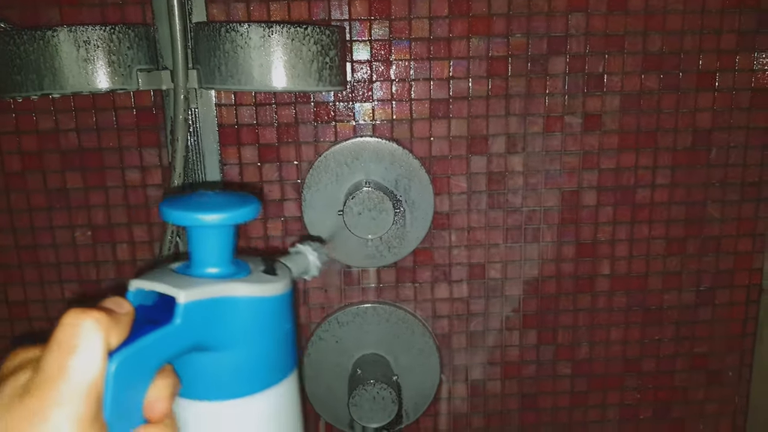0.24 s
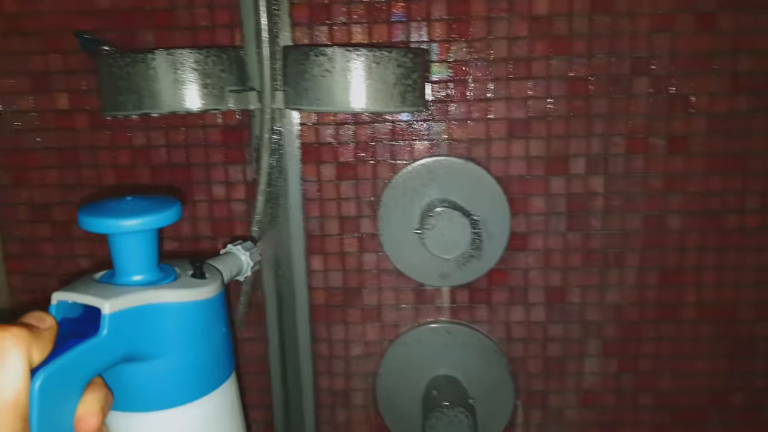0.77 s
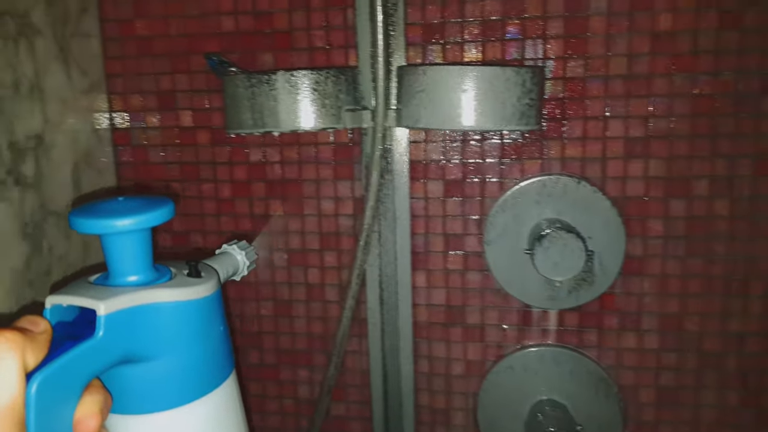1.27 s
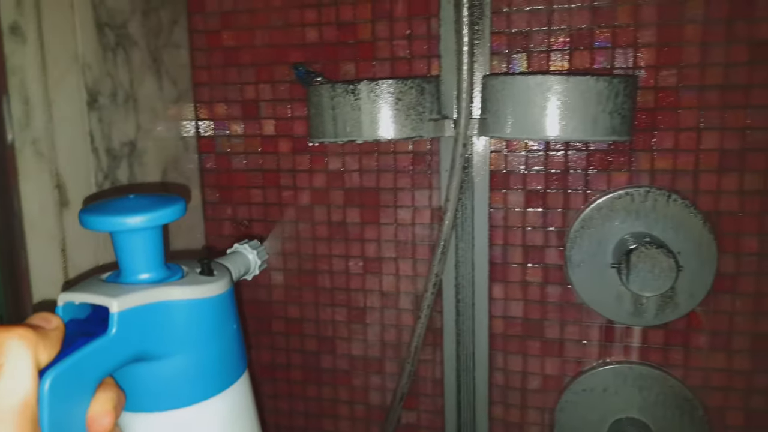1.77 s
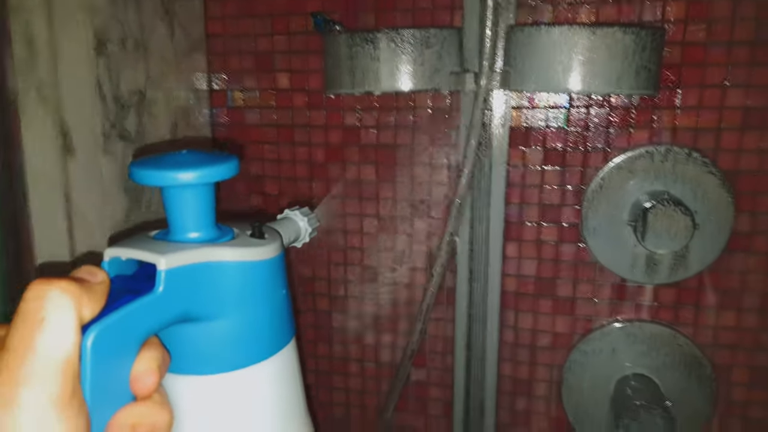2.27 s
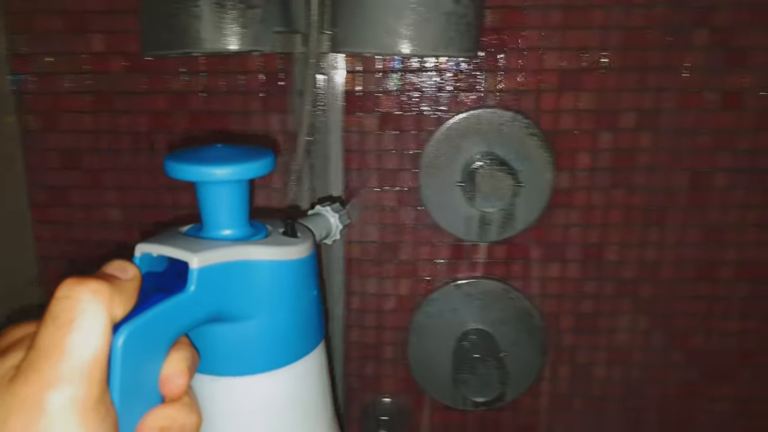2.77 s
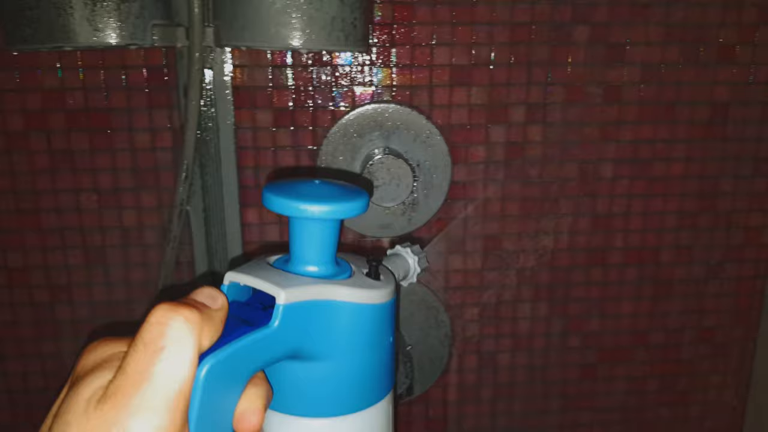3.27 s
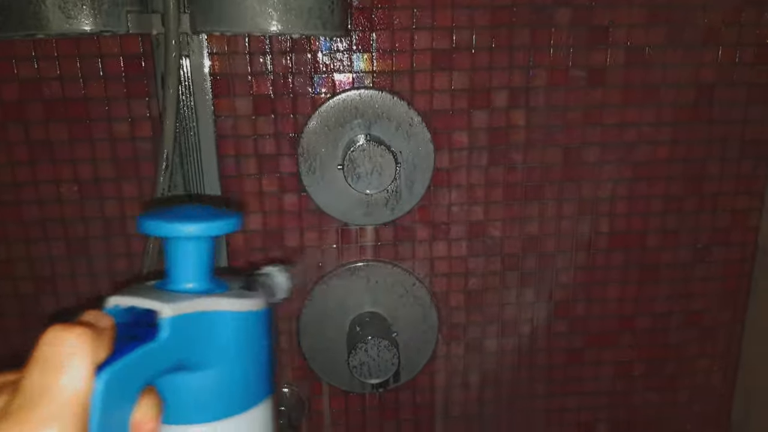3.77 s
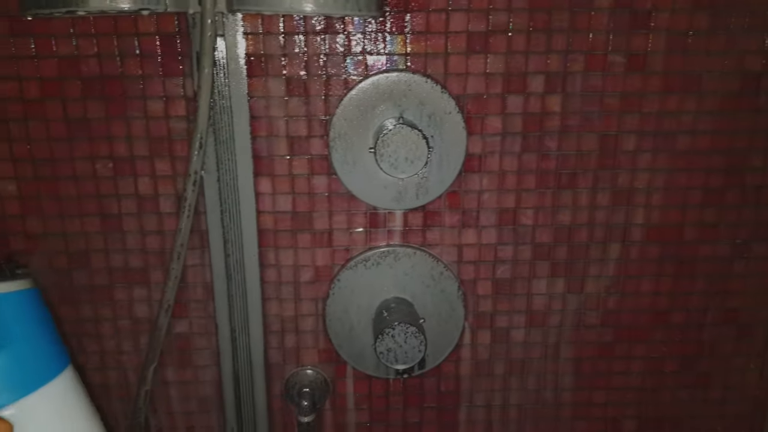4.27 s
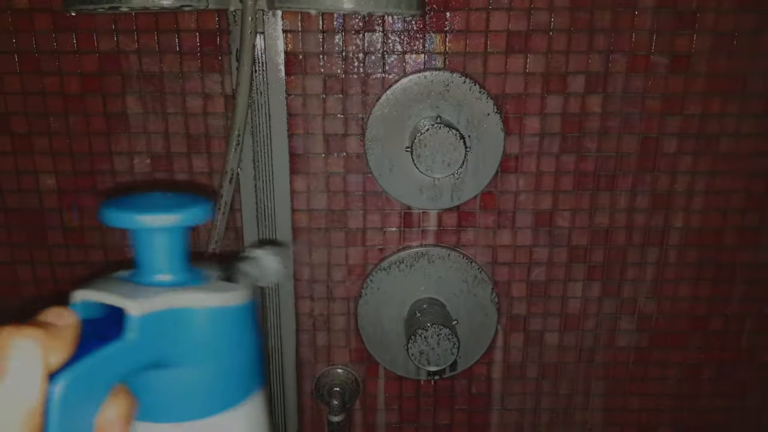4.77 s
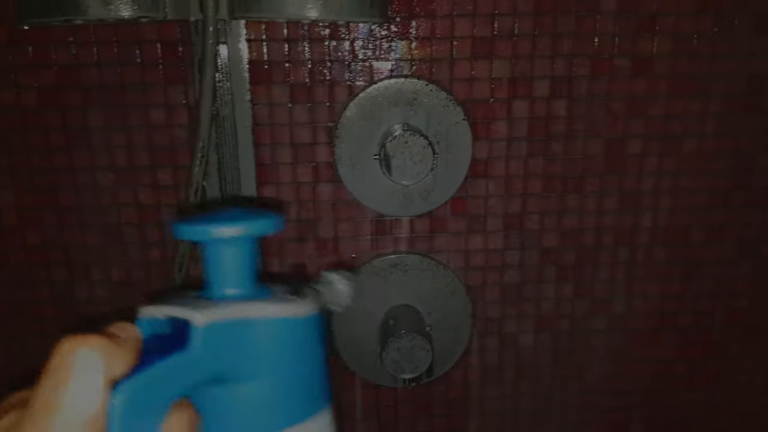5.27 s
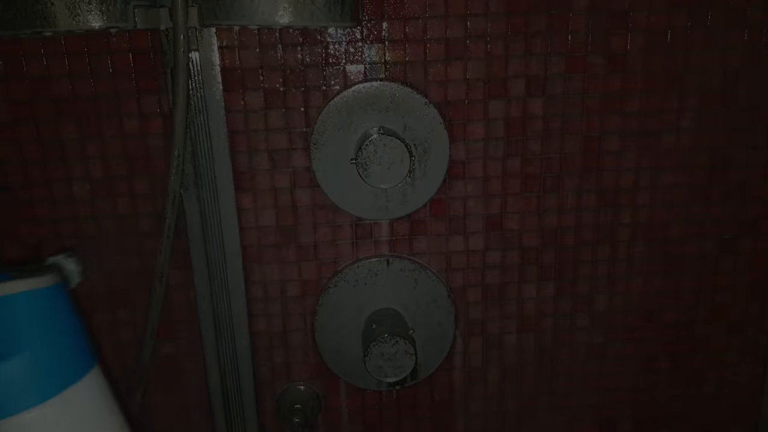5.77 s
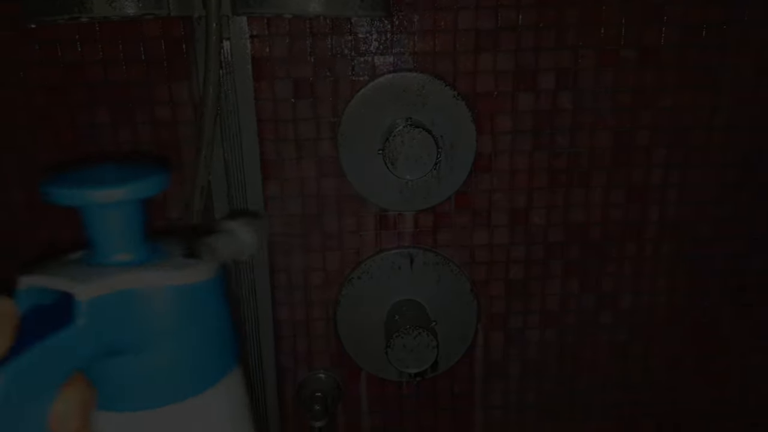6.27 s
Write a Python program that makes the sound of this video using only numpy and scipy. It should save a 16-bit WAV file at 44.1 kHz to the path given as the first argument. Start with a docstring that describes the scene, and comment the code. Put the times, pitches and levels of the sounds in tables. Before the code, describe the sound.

A hand-held pressure sprayer hisses steadily and brightly in a small tiled shower, its fine jet shimmering slightly before gradually fading away.

```python
"""A smooth bright hiss: a hand-held pressure sprayer in a small tiled shower stall, close to two ports.
The jet is coloured noise; delayed copies of it, the tile echoes, comb it, and sway with the hand.
Foam adds a low wash, and the nozzle whistles faintly as narrow gliding noise.
The stall hums as noise rings its low modes, and the grip bumps once as decaying sines and low noise.
The whole sound fades toward the end."""
import sys
import numpy as np
from scipy import signal
from scipy.fft import rfft, irfft
from scipy.io import wavfile

SR = 44100
rng = np.random.default_rng(int(sys.argv[2]) if len(sys.argv) > 2 else 0)


def unload_wav(signal):
    """Save mono or channel-first audio to the path in sys.argv[1] as 16-bit WAV at rate SR, clipped to [-1, 1]."""
    wavfile.write(
        sys.argv[1],
        SR,
        np.round(np.clip(np.atleast_2d(signal).T, -1, 1) * 32767).astype(np.int16),
    )


N = 288400  # length in samples
SPEED_OF_SOUND = 343  # m/s
OPPOSITE = np.array([[1], [-1]])  # signs of a difference between left and right


def from_db(db):
    """Amplitude ratio of a level: 20 dB per factor of ten."""
    return 10 ** (np.asarray(db) / 20)


def rms_one(x):
    """Normalisation to unit root-mean-square amplitude, over all channels together."""
    return x / np.sqrt(np.mean(x ** 2) + 1e-20)


def in_time(rows):
    """Linear interpolation of each column against the first, time in seconds."""
    s, *columns = np.transpose(rows)
    return [np.interp(np.arange(N) / SR, s, column) for column in columns]


def at_hz(points):
    """Interpolation of a (Hz, dB) table on logarithmic frequency, at every FFT bin."""
    hz = np.maximum(np.arange(N // 2 + 1) * SR / N, 1)
    table_hz, table_db = np.transpose(points)
    return np.interp(np.log(hz), np.log(table_hz), table_db)


def coloured(x, db):
    """Linear filtering by multiplication in the frequency domain, without phase shift."""
    return irfft(rfft(x) * from_db(db), N)


def drift(corner_hz):
    """Slow random fluctuation: white noise through two equal one-pole low-passes, unit rms."""
    step, run_in = 40, 4000  # samples per coarse point; coarse points dropped while the filter settles
    pole = np.exp(-2 * np.pi * corner_hz * step / SR)
    coarse = rng.standard_normal(N // step + run_in + 2)
    slow = signal.lfilter([1], [1, -2 * pole, pole * pole], coarse)[run_in:]
    return np.interp(np.arange(N) / step, np.arange(len(slow)), rms_one(slow))


def resonate(x, hz, width_hz):
    """Damped resonance: a conjugate pole pair whose radius sets the bandwidth."""
    radius = np.exp(-np.pi * width_hz / SR)
    poles = [1, -2 * radius * np.cos(2 * np.pi * hz / SR), radius * radius]
    return signal.lfilter([1, 0, -1], poles, x)


def jet_hiss(air, level_db, pan_db):
    """Turbulent jet noise: broadband noise shaped to the nozzle spectrum and panned by level."""
    # Nozzle hiss as the ports colour it. Each row: frequency in Hz, relative density in dB per Hz.
    nozzle_spectrum = [(760, -55), (1300, -26), (2100, -12.5), (2850, -11.5), (3230, -13.5), (3650, -10),
                       (4530, -6.5), (5750, -1), (6450, -2), (7150, 0), (7850, -10), (9300, -9),
                       (10900, -5.5), (11700, -.5), (14300, -1), (14900, 1.5), (16000, 2.5)]
    jet = sputter(rms_one(coloured(air, at_hz(nozzle_spectrum))))
    return jet * from_db(level_db + pan_db / 2 * OPPOSITE)


def sputter(jet):
    """Amplitude modulation by band: each range of the hiss flutters, partly together."""
    # Borders between the ranges. Each entry: frequency in Hz.
    borders_hz = [2920, 4750, 8450, 13200]
    flutter_db, flutter_hz, shared_part = 1.07, 14, 0.11
    shared = shared_part * drift(flutter_hz)
    out = 0
    for hz in borders_hz:
        low = signal.sosfiltfilt(signal.butter(2, hz, fs=SR, output="sos"), jet)
        out = out + low * from_db(flutter_db * (shared + drift(flutter_hz)))
        jet = jet - low
    # the range above the last border has half the flutter of its own
    return out + jet * from_db(flutter_db * (shared + 0.5 * drift(flutter_hz)))


def among_tiles(count=14):
    """Comb filtering: direct white noise meets delayed echoes whose path lengths sway with the hand."""
    first_s, last_s = .0015, .03  # echo delays before the sway
    start_db, t60_s = -12, 0.37  # echo level extrapolated to zero delay; time to fall by 60 dB
    port_gap_m, sway_m, sway_hz = .14, 0.0793, 0.2994
    lead, fine = SR // 10, 4  # samples of noise ahead of the start; oversampling for fine delays
    source = signal.resample(rng.standard_normal(N + lead), fine * (N + lead))
    now = np.arange(N) + lead
    out = np.tile(source[fine * now], (2, 1))
    sway = [drift(sway_hz) for axis in range(3)]
    for lag_s in np.geomspace(first_s, last_s, count):
        direction = rng.normal(0, 1, 3)  # how far each axis of sway lengthens this path
        side = rng.uniform(-1, 1)  # arrival from the left (-1) to the right (1)
        path_change_m = sway_m * sum(a * s for a, s in zip(direction, sway))
        lag = lag_s + path_change_m / SPEED_OF_SOUND
        gain = from_db(start_db - 60 * lag_s / t60_s)
        for ch, sign in enumerate((1, -1)):
            late = sign * side * port_gap_m / SPEED_OF_SOUND / 2
            at = np.clip(fine * (now - (lag + late) * SR), 0, len(source) - 1)
            out[ch] += gain * source[at.astype(int)]
    return rms_one(out)


def scattered():
    """Diffuse field: two noises whose coherence is set by the ratio of difference to sum."""
    # Difference (side) relative to sum (mid). Each row: frequency in Hz, side level in dB.
    side_re_mid = [(60, -21), (200, -38), (450, -6.5), (800, -10), (1250, -0.5), (2000, -4), (5000, 5),
                   (15000, -6.5)]
    mid, side = rng.standard_normal((2, N))
    side = coloured(side, at_hz(side_re_mid))
    return np.array([mid + side, mid - side])


def foam_wash(echoed, wash_db):
    """Splash noise from an extended source: foam lands over a wide patch, so its echoes blur."""
    # Foam on the tiles and room air. Each row: frequency in Hz, relative density in dB per Hz.
    foam_spectrum = [(15, -43), (25, -19), (60, -11), (110, -11), (190, -11), (330, -7), (480, -3.5),
                     (670, 1), (1000, 3), (1350, -4), (1950, -4), (3300, -48)]
    echo_db = -3  # factor on the echoed noise in the mix
    spread = scattered() + from_db(echo_db) * echoed
    waver_db = 1.0 * drift(7.6)
    return rms_one(coloured(spread, at_hz(foam_spectrum))) * from_db(wash_db + waver_db)


def swells(air):
    """Time-varying filtering: bands swell or thin out for a moment, some gliding, amid random patches."""
    # Bands. Each row: centre time in seconds, length in seconds, frequency in Hz, glide in Hz per
    # second, width in Hz, gain in dB.
    bands = [(0.4, 0.21, 5900, -400, 250, 2.5), (0.5, 0.43, 720, 0.1, 200, 4.5),
             (0.95, 0.36, 8100, 0.1, 300, -11), (1.106, 0.13, 3530, -900, 250, -3),
             (1.3, 0.74, 1190, 0.1, 200, 4), (1.4, .5, 13600, -500, 350, -1),
             (1.58, 0.25, 1900, 0.1, 150, 5.5), (1.85, 0.86, 7100, -900, 300, -5),
             (2.1, 0.25, 430, 0.1, 60, 4), (2.1, .6, 570, 0.1, 90, 3), (4.9, 1.0, 525, 0.1, 80, 2),
             (0.3, 1.2, 209, 0.1, 60, 5), (2.05, 0.37, 8200, 400, 200, -10), (2.7, .5, 6960, 601, 300, 2.5),
             (3.128, 0.071, 3870, 0.1, 900, 3.5), (6.2, .35, 3520, 0.1, 2500, 1),
             (3.2, .6, 6900, 3000, 400, -1), (3.4, 0.36, 4600, 600, 250, 4),
             (3.593, 0.74, 11850, 100, 350, 4.5), (4.105, 0.21, 6730, 0.1, 300, -8),
             (4.6, 1.5, 990, 0.1, 200, -3), (5.123, 0.18, 8600, 0.1, 250, -10),
             (5.142, 0.16, 5170, 0.1, 250, 3), (5.3, .9, 14600, 0.1, 400, 2),
             (5.5, 1.4, 10000, 300, 400, 4), (5.5, 0.39, 5100, -300, 200, 2), (5.55, .3, 700, 5, 200, 6.5),
             (5.852, 0.53, 2300, -200, 180, 4.5), (5.9, 0.63, 1000, 0.1, 250, -4),
             (5.92, 0.23, 11050, 0.1, 300, -6), (6.45, 0.22, 4950, 500, 250, 3)]
    # Depth of the small random patches. Each row: frequency in Hz, rms gain in dB.
    patch_depth = [(1800, 0.66), (3000, 2), (5500, 1.2), (8200, 2.5), (11000, 1.15)]
    patch_hz, patch_s = 109, .1  # two standard deviations of the smoothing bells
    hz, s, spectrum = signal.stft(air, SR, nperseg=1024)
    patch = rng.standard_normal(spectrum.shape[1:])
    for axis, width in enumerate((patch_hz / hz[1], patch_s / (s[1] - s[0]))):
        bell = np.exp(-2 * (np.arange(-30, 31) / width) ** 2)
        patch = signal.fftconvolve(patch, np.expand_dims(bell, 1 - axis), "same")
    gain_db = rms_one(patch) * np.interp(hz, *np.transpose(patch_depth))[:, None]
    for at, length, centre, glide, width, db in bands:
        off_hz = hz[:, None] - centre - glide * (s - at)
        in_moment = 8 * ((s - at) / length) ** 4
        in_band = 2 * (off_hz / width) ** 2
        gain_db = gain_db + db * np.exp(-in_moment - in_band)
    return signal.istft(spectrum * from_db(gain_db), SR, nperseg=1024)[1][:, :N]


def whistles():
    """Frequency translation: slow complex noise turns a gliding carrier into a faint nozzle whistle."""
    # Whistles. Each row: centre time in seconds, length in seconds, frequency in Hz, glide in Hz per
    # second, width in Hz, level in dB ahead of the ports' colour.
    whistle_rows = [(1.71, .3, 5730, 500, 240, -32), (2.0, .52, 6125, 60, 100, -32.5),
                    (2.25, .16, 5680, .1, 180, -33.5), (3.125, .09, 4080, .1, 250, -34.5),
                    (3.26, .14, 3950, -300, 200, -37)]
    side_gain = .4  # difference between the ports relative to their sum
    out, t = np.zeros((2, N)), np.arange(N) / SR
    for at, length, hz, glide, width_hz, db in whistle_rows:
        low_pass = signal.butter(4, width_hz / 2, fs=SR, output="sos")
        slow = signal.sosfilt(low_pass, rng.standard_normal((4, N)))
        mid, side = slow[:2] + 1j * slow[2:]
        carrier = np.exp(2j * np.pi * (hz * t + glide * (t - at) ** 2 / 2))
        band = rms_one(((mid + side_gain * side * OPPOSITE) * carrier).real)
        out += band * from_db(db) * np.exp(-8 * ((t - at) / length) ** 4)
    return out


def ports(x):
    """Sum-and-difference stereo: the port pair has its own side gain and left-right colour."""
    # Gain of the difference signal. Each row: frequency in Hz, gain in dB.
    side_gain = [(450, 0), (1200, 2), (1700, 2), (2200, -4), (2900, 2), (3600, -2), (6000, 0), (7300, 1),
                 (8300, -3), (11000, 1.5), (15000, 2)]
    # The ports differ in colour. Each row: frequency in Hz, left minus right in dB.
    left_right = [(200, -0.5), (500, 3.5), (1200, 0), (3300, 5.5), (5500, 1.5), (9000, 3.5), (15000, 4)]
    mid = (x[0] + x[1]) / 2
    side = coloured((x[0] - x[1]) / 2, at_hz(side_gain))
    half_db = at_hz(left_right) / 2
    return np.array([coloured(mid + side, half_db), coloured(mid - side, -half_db)])


def bump():
    """Impulse response of a body: a grip knock as decaying sines, then a tail of loose low noise."""
    # Knock by mode. Each row: start in seconds, amplitude in dB ahead of onset and decay,
    # frequency in Hz, time to fall by 60 dB in seconds.
    knock_modes = [(1.555, -43, 62, .16), (1.555, -51, 90, .35)]
    rattle_db, rattle_hz, rattle_t60_s = -50, 80, .45
    out = np.zeros(N)
    for s, db, hz, t60 in knock_modes:
        t = np.maximum(np.arange(N) / SR - s, 0)
        onset = 1 - np.exp(-t / 0.0032)
        out -= from_db(db - 60 * t / t60) * np.sin(2 * np.pi * hz * t) * onset
    t = np.maximum(np.arange(N) / SR - knock_modes[0][0], 0)
    loose = resonate(rng.standard_normal(N), rattle_hz, rattle_hz)
    loose = rms_one(resonate(loose, rattle_hz, rattle_hz))
    onset = 1 - np.exp(-t / .01)
    return out + loose * from_db(rattle_db - 60 * t / rattle_t60_s) * onset


def evened(x):
    """Envelope compression: narrow noise divided by a power of its Hilbert envelope."""
    evenness = 0.55  # 0 = plain ringing noise; near 1 the envelope is almost flat
    envelope = np.abs(signal.hilbert(x.mean(axis=0)))
    return rms_one(x / (envelope + 0.11) ** evenness)


def stall_modes(wash_db):
    """Room resonance: noise rings the air modes of the stall; three have wavering level curves."""
    # Air modes. Each row: frequency in Hz, width in Hz of the first of two resonators,
    # level in dB relative to the wash (used for the weak modes only).
    air_modes = [(61.2, 8, 0), (90, 6.9, -39), (137.7, 15, 0), (209, 17, -26.5), (267.6, 9.6, 0),
                 (318, 12, -35), (398.6, 33, -17)]
    # The hum wavers. Each row: time in seconds, level of the third air mode in dB,
    # level of the fifth in dB.
    strong_levels = [(0.0, -60, -57), (0.09, -63.5, -48), (0.27, -65, -71), (0.4, -58, -53),
                     (0.54, -58, -61), (0.63, -67, -62), (0.73, -58, -70), (0.8, -61, -52), (0.9, -64, -73),
                     (1.0, -64, -58), (1.1, -69, -77), (1.18, -58, -70), (1.28, -70, -59), (1.44, -57, -55),
                     (1.55, -59, -68), (1.63, -66, -67), (1.7, -56, -63), (1.88, -74, -72),
                     (2.0, -65, -59.5), (2.13, -67, -72), (2.31, -72, -54), (2.45, -81, -82),
                     (2.65, -70, -60), (2.79, -72, -80), (2.9, -65, -53), (3.04, -73, -74),
                     (3.25, -65, -64), (3.45, -73, -65), (3.72, -72, -63), (3.9, -78, -70.5),
                     (4.05, -63, -60.5), (4.17, -79, -67), (4.38, -67, -60), (4.52, -67.5, -53),
                     (4.7, -70, -63), (4.9, -78, -71), (5.06, -53.5, -60), (5.25, -71, -69),
                     (5.38, -67, -54), (5.62, -73, -75), (5.95, -71, -61), (6.15, -66, -64),
                     (6.33, -76, -73.5), (6.54, -70, -53)]
    # The lowest mode. Each row: time in seconds, level in dB.
    lowest_level = [(0, -72), (.5, -69), (1.0, -73), (1.4, -68), (2.1, -73), (2.3, -79), (2.5, -72),
                    (2.95, -70), (3.3, -73), (3.8, -76), (4.4, -80), (4.65, -71), (5.1, -69), (5.4, -75),
                    (5.75, -71), (6.1, -73), (6.54, -71)]
    side_db, waver_db, waver_hz = -21, 2.5, 1.2  # port difference re sum; waver of each weak mode
    rings = []
    for hz, width, db in air_modes:
        mid, side = rng.standard_normal((2, N))
        drive = mid + from_db(side_db) * side * OPPOSITE
        ring = resonate(resonate(drive, hz, width), hz, 2 * width)
        rings.append(rms_one(ring) * from_db(db))
    weak = sum(rings[k] * from_db(waver_db * drift(waver_hz)) for k in (1, 3, 5, 6))
    levels = in_time(strong_levels) + in_time(lowest_level)
    strong = [evened(rms_one(rings[k])) * from_db(db) for k, db in zip((2, 4, 0), levels)]
    return weak * from_db(wash_db) + sum(strong)


def scene():
    """Superposition: jet and wash share the echoed noise; whistles, modes and knock are added."""
    # The spray ahead of swells and ports. Each row: time in seconds, jet level in dB,
    # wash level relative to the jet in dB, left minus right of the jet in dB.
    spray = [(0.0, -14.5, -32.5, -4), (0.38, -14.5, -32, -4), (2.24, -15, -32, -3.5),
             (3.75, -15.5, -32.5, -5), (4.06, -15, -31.5, -4), (4.7, -16, -33.5, -4),
             (5.1, -15.5, -32, -4.5), (5.5, -15.5, -33, -3.5), (6.0, -15.5, -32, -4.5),
             (6.54, -16, -30.5, -3.5)]
    # Scattered sound added to the echoed noise. Each row: frequency in Hz, gain in dB.
    scatter_gain = [(800, -19), (1600, -6.5), (3000, -8), (8000, -15.5), (13000, -8)]
    level_db, wash_re_jet_db, pan_db = in_time(spray)
    wash_db = level_db + wash_re_jet_db
    echoed = among_tiles()
    air = echoed + coloured(scattered(), at_hz(scatter_gain))
    jet = jet_hiss(air, level_db, pan_db)
    wash = foam_wash(echoed, wash_db)
    return ports(swells(jet + wash) + whistles()) + stall_modes(wash_db) + bump()


def record(dry):
    """Gain envelope and band limit: a sagging fade, then a steep elliptic low-pass."""
    start_s, end_s, power = 4.75, 6.97, 1.43  # the fade would reach silence after the sound ends
    cutoff_hz = 15725
    remaining = np.clip((end_s - np.arange(N) / SR) / (end_s - start_s), 0, 1)
    # 0.3 dB of ripple below the cutoff, 75 dB of rejection above
    low_pass = signal.ellip(14, .3, 75, cutoff_hz, fs=SR, output="sos")
    return signal.sosfilt(low_pass, remaining ** power * dry)


dry = scene()
out = record(dry)
unload_wav(out)
```